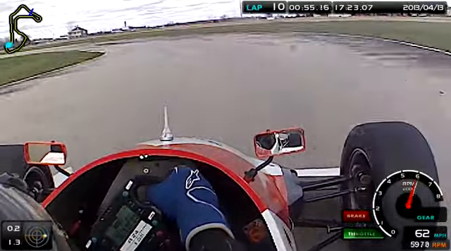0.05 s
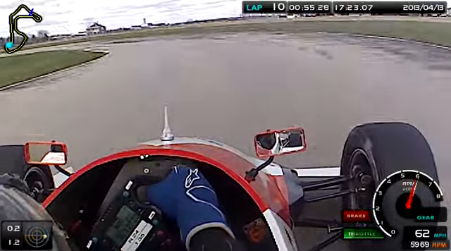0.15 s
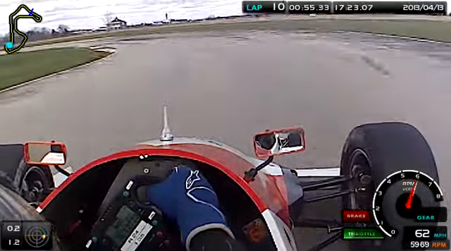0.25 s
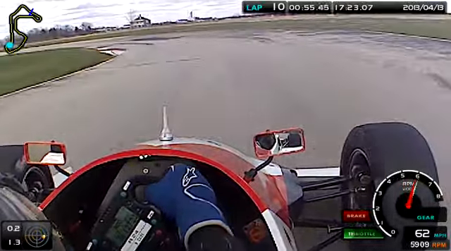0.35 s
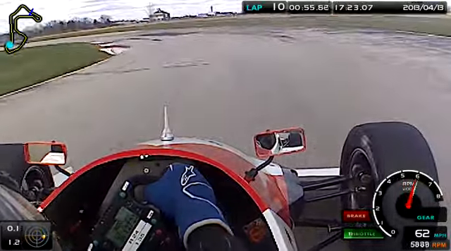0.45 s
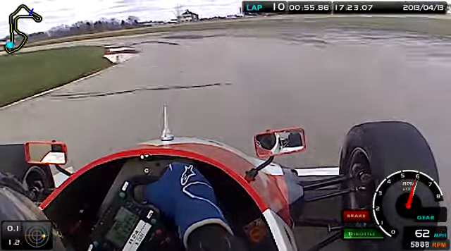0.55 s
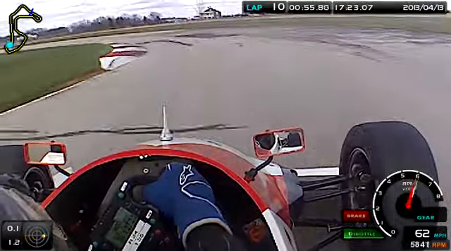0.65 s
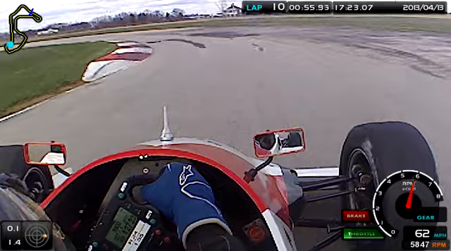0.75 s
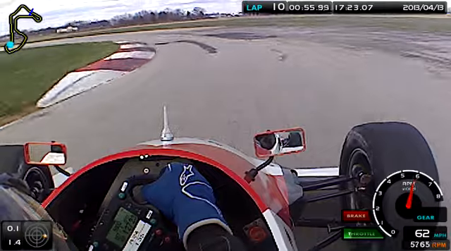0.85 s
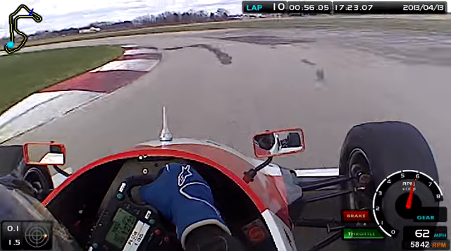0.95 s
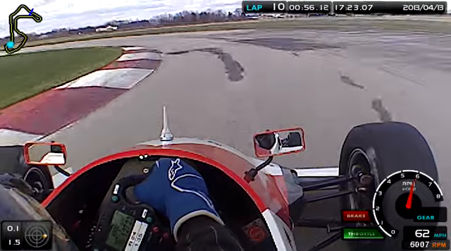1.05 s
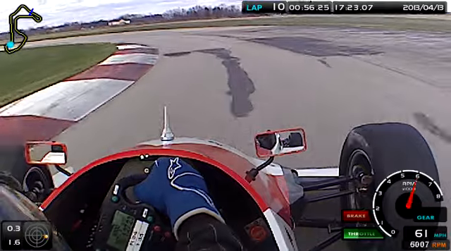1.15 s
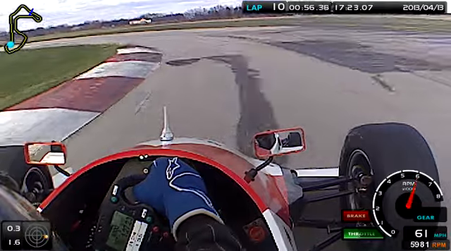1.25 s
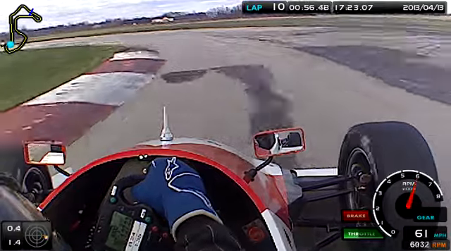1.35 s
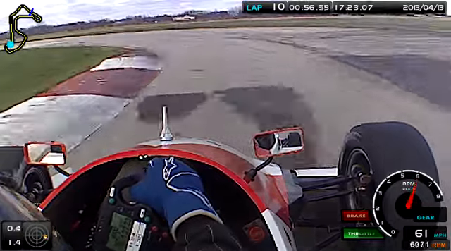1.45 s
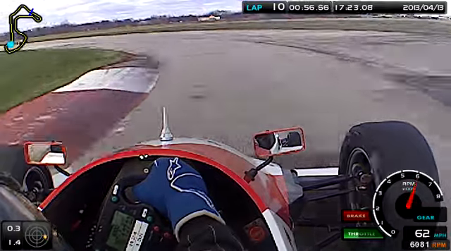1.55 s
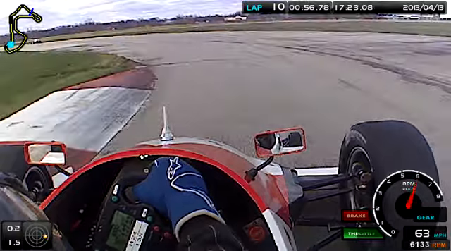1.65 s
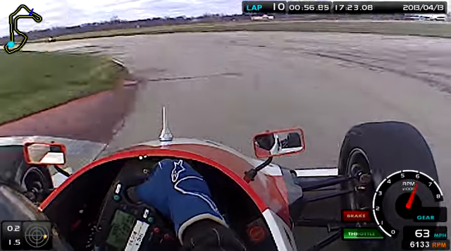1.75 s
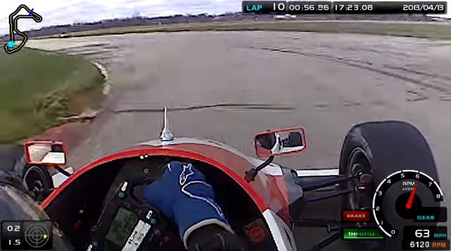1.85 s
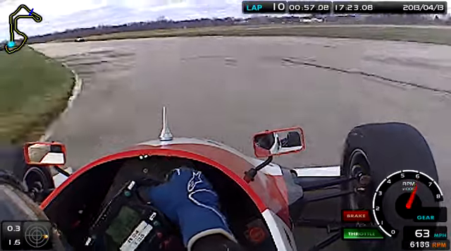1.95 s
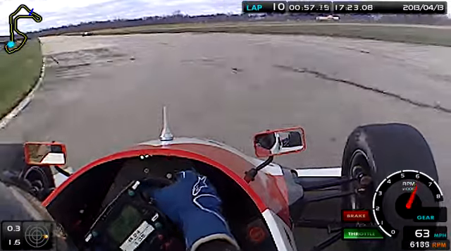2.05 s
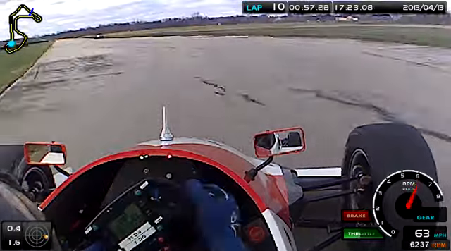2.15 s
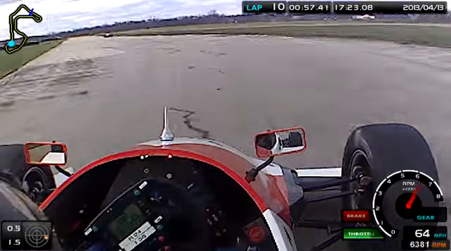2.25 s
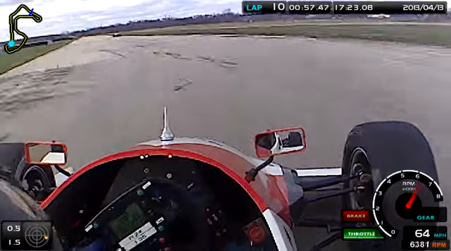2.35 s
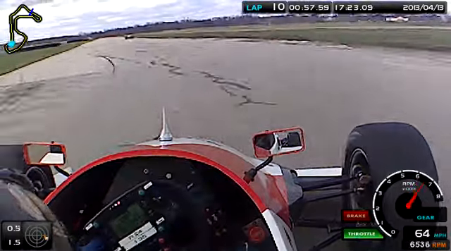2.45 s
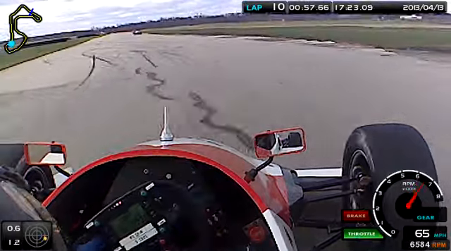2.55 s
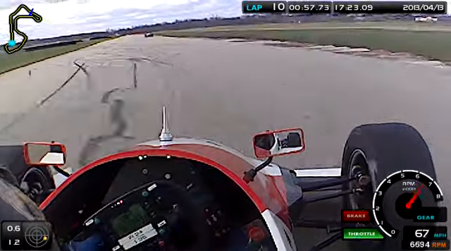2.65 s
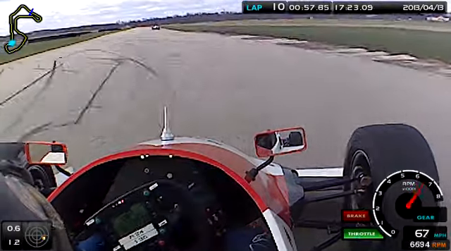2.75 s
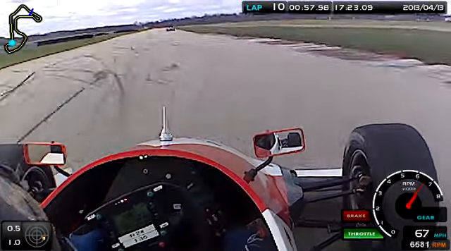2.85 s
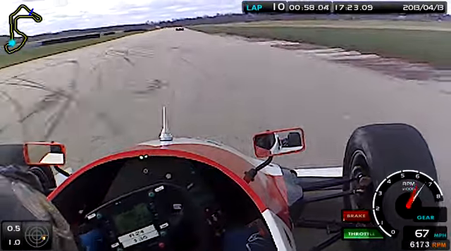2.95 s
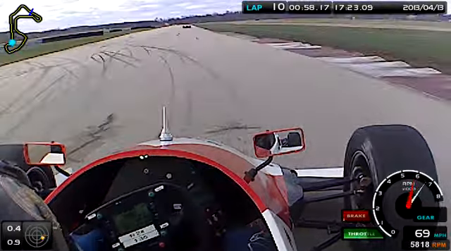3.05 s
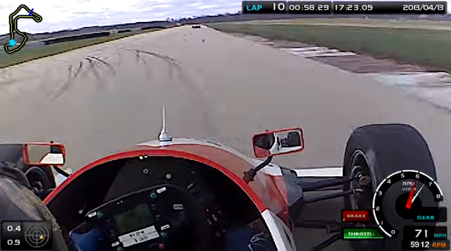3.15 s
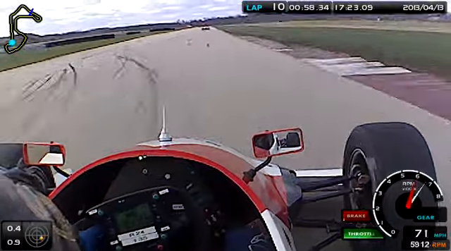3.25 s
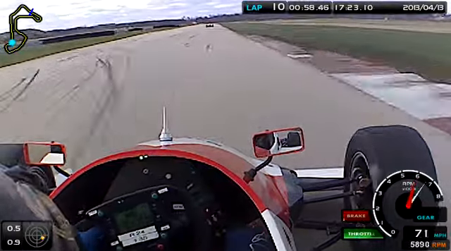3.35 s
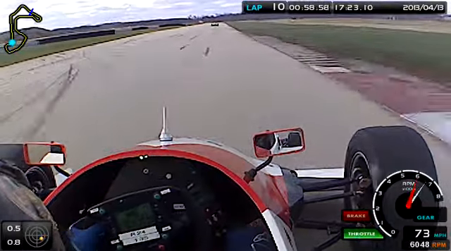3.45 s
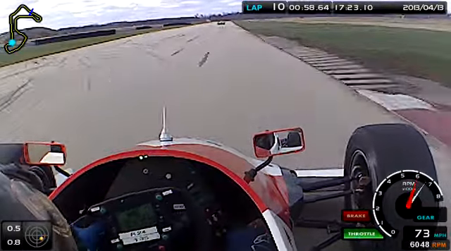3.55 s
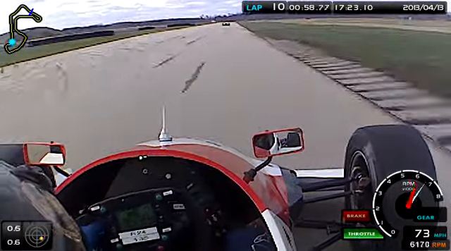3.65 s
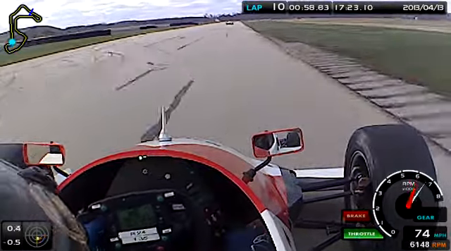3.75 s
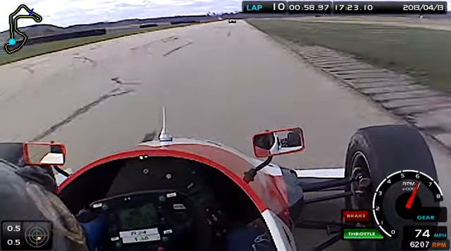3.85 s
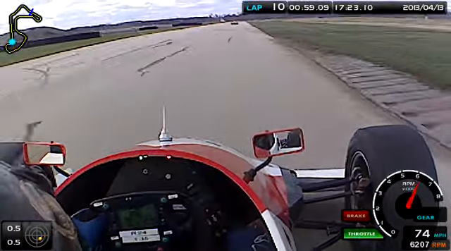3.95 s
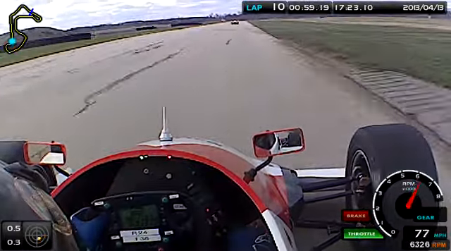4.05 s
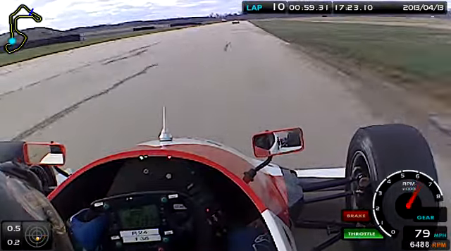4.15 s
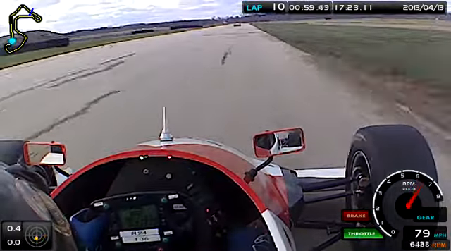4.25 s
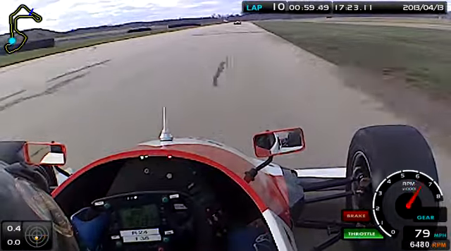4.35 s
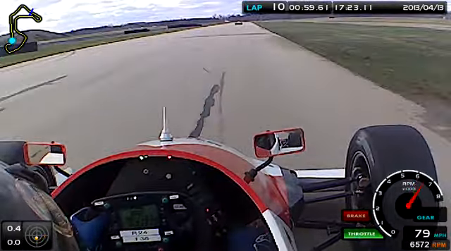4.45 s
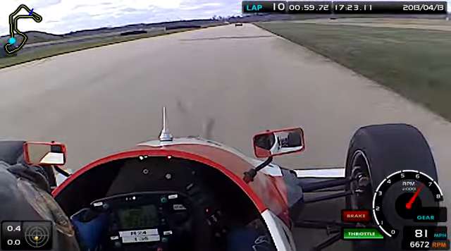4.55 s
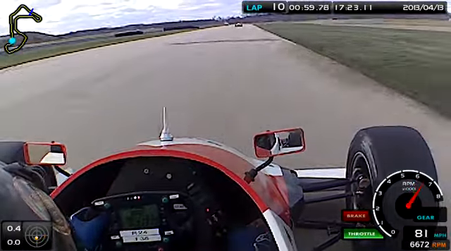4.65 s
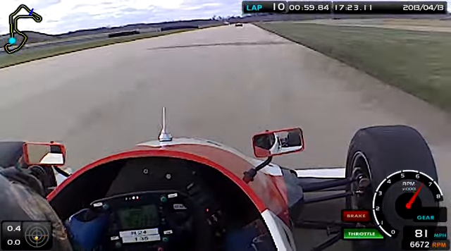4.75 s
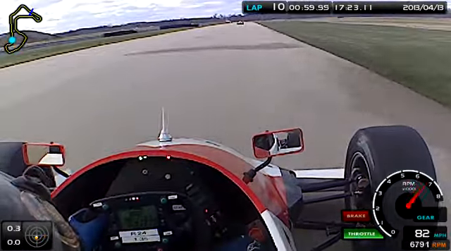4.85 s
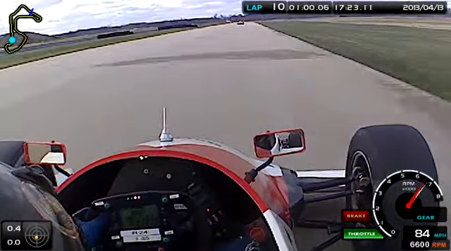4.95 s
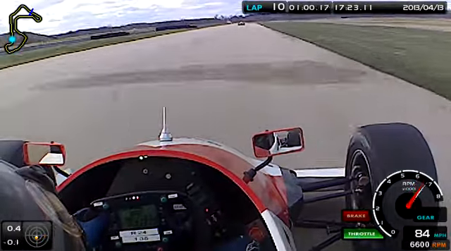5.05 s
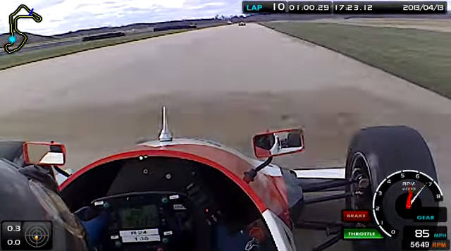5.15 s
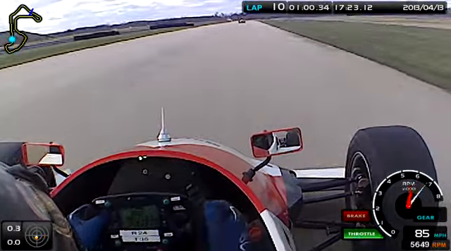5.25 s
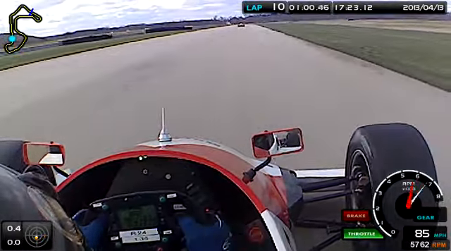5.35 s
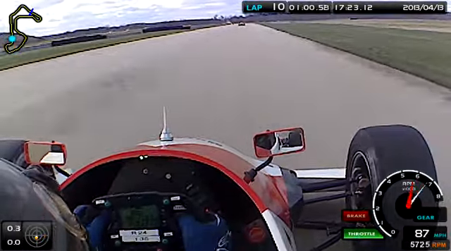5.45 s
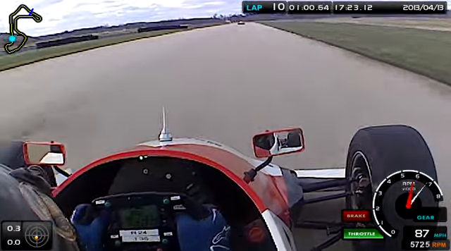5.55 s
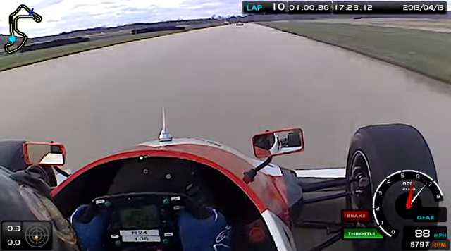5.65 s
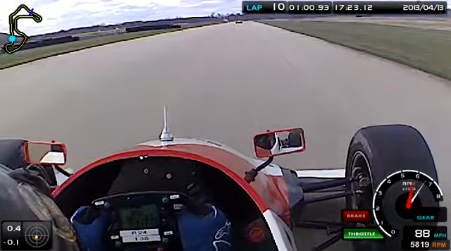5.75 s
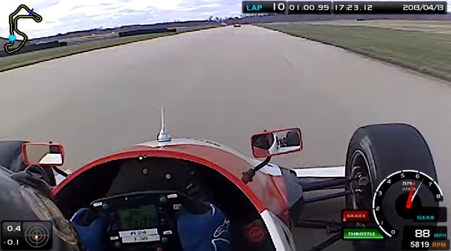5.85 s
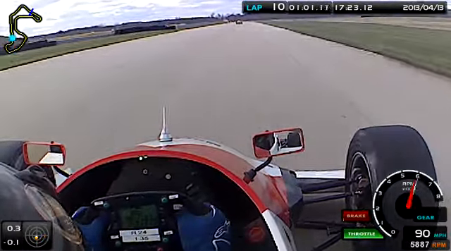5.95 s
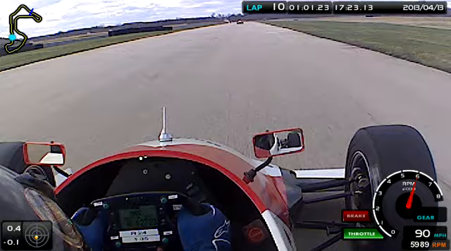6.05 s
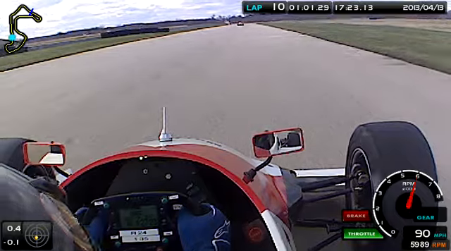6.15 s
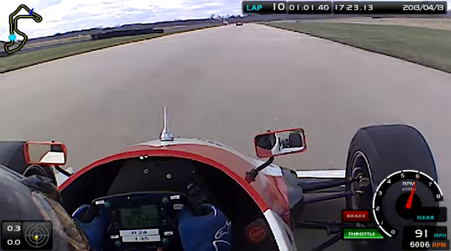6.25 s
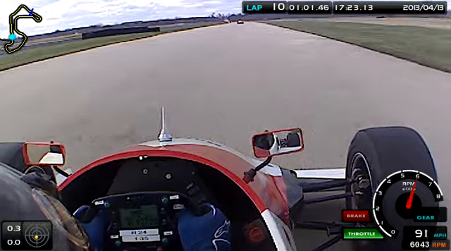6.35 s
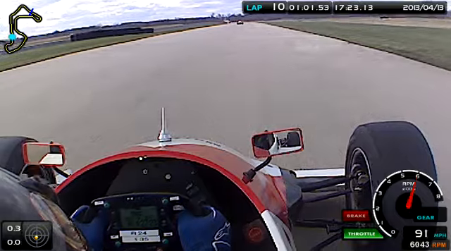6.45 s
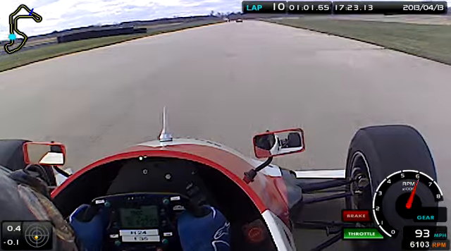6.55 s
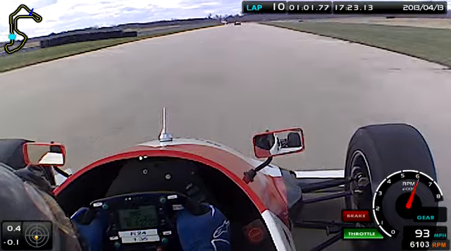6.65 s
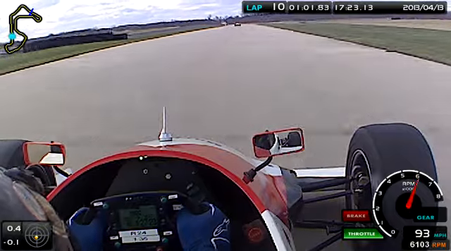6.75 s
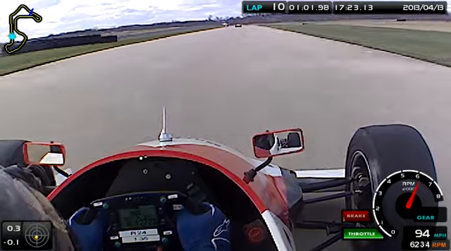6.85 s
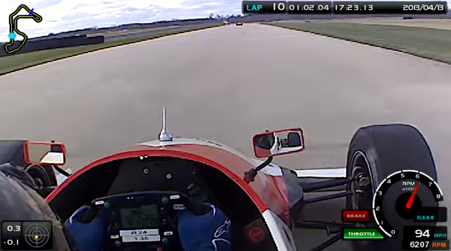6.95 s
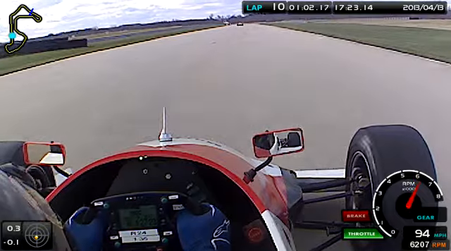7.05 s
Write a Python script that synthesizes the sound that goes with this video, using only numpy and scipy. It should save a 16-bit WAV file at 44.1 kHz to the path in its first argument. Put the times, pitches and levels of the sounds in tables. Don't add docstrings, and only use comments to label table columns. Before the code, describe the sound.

An onboard microphone catches a buzzy two-rotor race engine leaving a corner: ragged, stuttering misses first, a firmer tone, then full-throttle roar with ringing bodywork and a deep drone. Two fast upshifts each interrupt the sound, thud through the chassis and lower the pitch, which rises again. Lumpy wind rumbles throughout outdoors; the sound is dry, close, narrow and slightly distorted.

```python
import sys
import numpy as np
from scipy import signal
from scipy.fft import rfft, irfft, next_fast_len
from scipy.io import wavfile
from scipy.ndimage import uniform_filter1d

SR = 44100
rng = np.random.default_rng(int(sys.argv[2]) if len(sys.argv) > 2 else 0)


def gain_from_db(level_db):
    decades = np.asarray(level_db, float) / 20
    return 10 ** decades


def wrap_up_sound(samples):
    columns = np.atleast_2d(samples).T
    tamed = np.clip(columns, -1, 1)
    steps = np.round(tamed * 32767).astype(np.int16)
    wavfile.write(sys.argv[1], SR, steps)


N = 313110


def engine():
    steady_rate, surge = revs()
    load_db, favoured_hz, lean, wide = throttle()
    lone, missing = misses()
    cut_db, refire = ignition_cuts()
    turns = np.cumsum((steady_rate + surge) * (1 + 0.0015 * drift(0.02))) / SR

    clicks = blows(turns, missing, cut_db)
    rush = puffs(turns, lean, wide, refire)
    level_db = SURGE_LEVEL_DB * surge + stumbles() + cut_db - 6 * missing
    body = bodywork(clicks, rush, load_db, favoured_hz, level_db, wide)
    low = drones(turns, steady_rate, lean, wide, lone, missing, cut_db)
    return flexed(body, 0.4 + 0.6 * wide) + low + rattle(lean, wide, cut_db)


SURGE_LEVEL_DB = -0.16

# (pitch [Hz], width [Hz], level [dB], travel time [ms])
BODY_MODES = [
    [(452, 45, 2, 0.3), (600, 163, 3.5, 2.133), (861, 39, -1, 0.41), (1074, 69, 1, 5.3),
     (1310, 48, 2, 0.47)],
    [(1519.6, 78, -0.5, 1.657), (1731, 109.3, -5, 3.22), (1937, 117, -4.5, 0.2), (2024, 70, -7, 3.2)],
    [(2274.6, 86.4, 1.5, 1.156), (2464, 74.7, -7.5, 0.17), (2600, 70.4, 0, 3.294),
     (2785.6, 83.1, 1.5, 0.087)],
    [(3132, 93, -5.5, 0.14), (3234, 66, -2.5, 2.39), (3412, 98.8, -4, 3.257), (3752, 134, -9.5, 1.06),
     (4170, 157, -9, 4), (4475, 166, -16, 0.88), (4934, 173, -16.5, 5.93), (5280, 398.5, -18, 4.63),
     (5950, 410, -19, 2.34), (7280, 580, -28.5, 4.15), (8150, 19, -48, 2.5), (7860, 270, -46.5, 18)],
]
FULL_LOAD_DB = (-23.5, -20, -9.5, -21)
LOAD_FOLLOW = (0.351, .65, 1.01, 1.2)
RUSH_SHARE = (.08, .25, .22, .75)
MODE_SWELL_DB = (.6, 1.3, .8, 0)


def bodywork(clicks, rush, load_db, favoured_hz, level_db, wide):
    body = np.zeros(N)
    parts = zip(BODY_MODES, FULL_LOAD_DB, LOAD_FOLLOW, RUSH_SHARE, MODE_SWELL_DB)
    for modes, full_db, follows, share, swell_db in parts:
        wander_db = (0.33 + 0.35 * wide) * drift(0.023)
        part_db = full_db + follows * load_db + level_db + wander_db
        body += gain_from_db(part_db) * ring(clicks + share * rush, modes, swell_db, favoured_hz)
    return body


def blows(turns, missing, cut_db):
    clicks = firings(turns, 0.5 * missing, jitter=8e-6, spread_db=0.6, weak_db=-2.0)
    return evened(clicks) * gain_from_db(1.5 * np.maximum(cut_db, -8))


def firings(turns, missing, jitter, spread_db, weak_db):
    lag_s = 17e-6
    at = np.interp(np.arange(1, int(turns[-1])), turns, np.arange(N))
    chance = rng.standard_normal((len(at), 2))
    second = np.arange(len(at)) % 2
    size = gain_from_db(spread_db * chance[:, 0] + weak_db * second)
    size = size * (1 - second * missing[at.astype(int)])
    at = np.clip(at + jitter * SR * chance[:, 1] + lag_s * SR * second, 8, N - 9)
    near = np.round(at).astype(int)[:, None] + np.arange(-8, 9)
    clicks = np.zeros(N + 1)
    np.add.at(clicks, near, size[:, None] * np.sinc(near - at[:, None]) * np.hanning(17))
    return clicks[:N]


def puffs(turns, lean, wide, refire):
    rush = evened((0.5 + np.exp(-(turns % 1) / 0.9)) * rng.standard_normal(N))
    ragged_lean, ragged_part, ragged_wide = 1.7, 0.55, 1.65
    ragged = ragged_part + lean * (ragged_lean - ragged_part) + wide * (ragged_wide - ragged_part)
    return rush * (ragged + refire)


# (firing rate [1/s], firing drone level [dB], shaft drone level [dB])
BOOM_BY_SPEED = [(184, -25.5, -46), (191.3, -30, -30), (200.7, -38, -26), (202.6, -25.5, -25.5),
                 (212.3, -25.5, -25), (213.3, -26.5, -23), (230, -20.5, -23)]
# (firing level [dB], shaft level [dB])
PART_THROTTLE_DB = (-19, -25)


def drones(turns, steady_rate, lean, wide, lone, missing, cut_db):
    speeds, *booms_db = np.transpose(BOOM_BY_SPEED)
    levels_db = []
    for part_db, boom_db in zip(PART_THROTTLE_DB, booms_db):
        wide_db = np.interp(steady_rate, speeds, boom_db)
        levels_db.append(part_db + wide * (wide_db - part_db))
    firing_db, shaft_db = levels_db
    shaft_db = shaft_db - 5.4 * lean + 0.3 * cut_db + 0.86 * drift(0.055)
    firing_db = firing_db + 0.33 * cut_db + 0.44 * drift(0.041) - 9.8 * missing
    shaft = (gain_from_db(shaft_db) + lone) * np.cos(np.pi * turns)
    firing = gain_from_db(firing_db) * np.cos(2 * np.pi * turns + 0.99)
    return np.sqrt(2) * (shaft + firing)


# (time [s], firing rate [1/s])
ENGINE_SPEED = [(0, 197.5), (.42, 196.5), (.62, 192.8), (.75, 199.5), (1.6, 204), (2.1, 215.5),
                (2.54, 225.4), (2.62, 219), (2.7, 194.7), (2.8, 192.1), (3.6, 207.8), (4.69, 228.4),
                (4.76, 223.7), (4.84, 182), (4.95, 187.4), (6, 199.9), (7.1, 211.5)]
# (time [s], surge in firing rate [1/s])
DRIVELINE_BUMPS = [(0.935, 2.0), (1.169, 1.4), (1.483, 1.4), (1.668, 2.4), (1.834, 4.4), (2.024, 4.4),
                   (2.173, 1.1), (2.253, 3.9), (2.338, 6.2), (2.55, 4.5), (2.78, 2.8), (3.012, 3.4),
                   (3.167, 1.5), (3.377, 3.1), (3.552, 1.4), (3.693, 2.8), (3.857, 3.0), (4.005, 2.0),
                   (4.157, 2.5), (4.345, 2.4), (4.686, 1.4), (4.899, 4.5), (5.207, 2.7), (5.538, 1.6),
                   (5.723, 2.2), (5.909, 1.8), (6.264, 3.1), (6.57, 3.0), (6.935, 1.6)]


def revs():
    shuffle_hz, shuffle_s, lead = 6.0, 0.058, 0.76
    t = np.arange(N) / SR
    coarse = t[::32]
    surge = np.zeros(len(coarse))
    for s, size in DRIVELINE_BUMPS:
        swing = np.cos(2 * np.pi * shuffle_hz * (coarse - s) + lead)
        surge += size * np.exp(-((coarse - s) / shuffle_s) ** 2) * swing
    return played(ENGINE_SPEED)[0], np.interp(t, coarse, surge)


# (time [s], load level [dB] below full, pitch of the cowl panel that rings most [Hz])
ENGINE_LOAD = [(0, -14, 2290), (.66, -14.5, 2430), (.755, -5, 2240), (1.1, -7.5, 2120), (1.745, -7.5, 2590),
               (1.83, 0, 2720), (2.3, 2, 2700), (2.6, -0.5, 2910), (2.75, -3, 2780), (3.1, -1, 2600),
               (3.6, 0, 2710), (3.9, 2.5, 2340), (4.3, -0.5, 2530), (4.7, 1, 2600), (5.1, -1, 2600),
               (5.45, -2, 2770), (6.1, -1, 2740), (7.1, 2.5, 2640)]


def throttle():
    lean_below_db, floored_s, flooring_s = -11, 1.83, 0.089
    load_db, favoured_hz = played(ENGINE_LOAD)
    lean = np.clip((lean_below_db - load_db) / 2, 0, 1)
    wide = np.clip((np.arange(N) / SR - floored_s) / flooring_s + 1, 0, 1)
    return load_db, favoured_hz, lean, wide


# (time [s], length [s], shaft drone level [dB])
ROTOR_MISSES = [(0.0, 0.032, -21.5), (0.056, 0.078, -15), (0.167, 0.019, -14.5), (0.278, 0.026, -16),
                (0.332, 0.029, -16.5), (0.394, 0.014, -15.5), (0.444, 0.039, -22), (0.518, 0.067, -17.5),
                (0.625, 0.032, -20.5)]


def misses():
    t = np.arange(N) / SR
    lone = uniform_filter1d(sum(gain_from_db(db) * (t > s) * (t < s + length) for s, length, db in ROTOR_MISSES), 200)
    return lone, np.clip(lone / gain_from_db(-26.5), 0, 1)


# (time [s], length [s], depth [dB])
SHIFT_CUTS = [
    (2.613, 0.08, -15.5),
    (4.754, 0.08, -10),
]


def ignition_cuts():
    t = np.arange(N) / SR
    cut_db, refire = np.zeros(N), np.zeros(N)
    for s, length, db in SHIFT_CUTS:
        cut_db += db * (t > s) * (t < s + length)
        refire += 1.5 * (t > s) * np.exp(-np.maximum(t - s - length, 0) / 0.12)
    return uniform_filter1d(cut_db, 800), refire


# (time [s], level [dB])
WEAK_FIRINGS = [(1.87, -8.5), (1.915, -3), (2.045, -2), (2.125, -6), (2.44, -1.5), (2.485, -1.5),
                (2.562, -4), (2.723, -4.5), (2.865, -2), (2.925, -1.5), (3.061, -2.5), (3.18, -3),
                (4.141, -3), (4.25, -3.5), (4.889, -3.5), (5.39, -3.5), (5.9, -0.5)]


def stumbles():
    t = np.arange(N) / SR
    coarse = t[::32]
    return np.interp(t, coarse, sum(db * np.exp(-((coarse - s) / 0.013) ** 2) for s, db in WEAK_FIRINGS))


def ring(x, modes, swell_db, favoured_hz=0):
    size = next_fast_len(N + 8192)
    hz = np.fft.rfftfreq(size, 1 / SR)
    power = np.array([gain_from_db(2 * db) / (1 + ((hz - f) / width) ** 2) ** 2 for f, width, db, ms in modes])
    total = power.sum(0)
    late_s = np.transpose(modes)[3] @ power / total / 1000
    delay = np.exp(-2j * np.pi * np.cumsum(late_s) * hz[1])
    whole = rfft(x, size) * delay / np.sqrt(total)
    if not swell_db:
        return evened(irfft(whole * total, size)[:N])
    out = np.zeros(N)
    for (f, *_), share in zip(modes, power):
        favour_db = 5.1 * np.exp(-((f - favoured_hz) / 320) ** 2)
        out += gain_from_db(swell_db * drift(0.019) + favour_db) * irfft(whole * share, size)[:N]
    return evened(out)


def flexed(x, depth):
    flex_db, flex_radians, stiff_below_hz = 2.0, 1.0, 1200
    z = signal.stft(x, nperseg=1024, noverlap=768)[2]
    frames = z.shape[1]
    patches = rng.standard_normal((frames, 256, 2)).T
    patches = uniform_filter1d(patches, 4, 1)
    patches = uniform_filter1d(uniform_filter1d(patches, 13, 2), 17, 2)
    gain, slip = evened(patches) * depth[np.minimum(np.arange(frames) * 256, N - 1)]
    hz = np.arange(256)[:, None] * SR / 1024
    gain = gain * np.clip(hz / stiff_below_hz - 0.4, 0.3, 1)
    z[:256] *= gain_from_db(flex_db * gain - 0.115 * flex_db ** 2) * np.exp(1j * flex_radians * slip)
    return signal.istft(z, nperseg=1024, noverlap=768)[1][:N]


PART_RATTLE_DB = (-41, -35, -27, -37.5)


def rattle(lean, wide, cut_db):
    out = np.zeros(N)
    for modes, rattle_db in zip(BODY_MODES, PART_RATTLE_DB):
        calm_db = 1.5 * (1 - lean) * (1 - wide)
        level_db = rattle_db - calm_db + 0.08 * cut_db + 1.5 * drift(0.01)
        out += gain_from_db(level_db) * ring(rng.standard_normal(N), modes, swell_db=0)
    return out


# (time [s], peak level [dB], pitch [Hz])
DOG_CLUNKS = [(2.647, -15, 61.5), (2.68, -18, 92), (4.765, -27, 78), (4.79, -28.5, 72),
              (4.804, -16.5, 91.6)]


def gearbox():
    out, t = np.zeros(N), np.arange(1500) / SR
    for s, db, hz in DOG_CLUNKS:
        push = gain_from_db(db - 60 * t / 0.042) * np.sin(2 * np.pi * hz * t)
        out[round(s * SR):][:len(t)] += push
    return out


# (pitch [Hz], level per Hz [dB])
BUFFET_SPECTRUM = [(12, -52), (20, 2), (97, -1.5), (170, -10), (370, -19), (500, -25), (650, -44.5),
                   (1100, -120)]
# (time [s], level [dB])
WIND_GUSTS = [(0.0, -19.5), (0.1, -25.5), (1.22, -28.5), (1.34, -29.5), (1.5, -23), (2.06, -25.5),
              (2.63, -24), (3.1, -28), (6.72, -23.5), (6.92, -26), (6.94, -22.5), (7.1, -25)]


def wind():
    frames, hz = N // 512 + 5, np.fft.rfftfreq(2048, 1 / SR)
    a, b, patches = rng.standard_normal((frames, 1025, 3)).T
    patches = evened(uniform_filter1d(uniform_filter1d(patches, 3, 0), 4, 1))
    f, db = np.transpose(BUFFET_SPECTRUM)
    spectrum_db = np.interp(np.log(hz + 1), np.log(f + 1), db)[:, None]
    z = (a + 1j * b) * gain_from_db(spectrum_db + 1.7 * patches)
    noise = signal.istft(z, nperseg=2048, noverlap=1536)[1][:N]
    return gain_from_db(played(WIND_GUSTS)[0] + 4.5 + 0.5 * drift(0.035)) * evened(noise)


# (pitch [Hz], width [Hz], level [dB], travel time [ms])
HISS_MODES = [(6900, 300, -4, 0), (7550, 110, 3, 0), (8300, 350, -6, 0)]


def electronics():
    return gain_from_db(-56) * ring(rng.standard_normal(N), HISS_MODES, swell_db=0)


def evened(x):
    return x / np.sqrt(np.mean(x ** 2) + 1e-20)


def drift(seconds):
    step, span = 32, int(seconds * SR / 32) + 1
    coarse = rng.standard_normal(N // step + 2)
    coarse = uniform_filter1d(uniform_filter1d(coarse, span), span)
    return np.interp(np.arange(N) / step, np.arange(len(coarse)), evened(coarse))


def played(rows):
    s, *columns = np.transpose(rows)
    return [np.interp(np.arange(N) / SR, s, c) for c in columns]


def scene():
    return (engine() + gearbox() + wind() + electronics())[None]


def roll_off(x):
    return signal.sosfilt(signal.butter(12, 15740, fs=SR, output="sos"), x)


def record(dry):
    overload, edge_hz = 0.71, 8800
    hz = np.fft.rfftfreq(N, 1 / SR)
    housing = gain_from_db(-5 / (1 + ((hz - 1270) / 110) ** 4)) / (1 + (hz / edge_hz) ** 60)
    narrow = irfft(rfft(dry) * housing * hz / (hz + 6), N)
    loaded = np.clip(narrow, -overload, overload)
    dip_db = -6 / (1 + ((hz - 10300) / 1500) ** 4)
    fall_db = -4 / (1 + (14800 / (hz + 1)) ** 20)
    dulled = irfft(rfft(loaded) * gain_from_db(-1.5 * (hz > 7000) + dip_db + fall_db), N)
    return roll_off(dulled)


dry = scene()
out = record(dry)
wrap_up_sound(out)
```